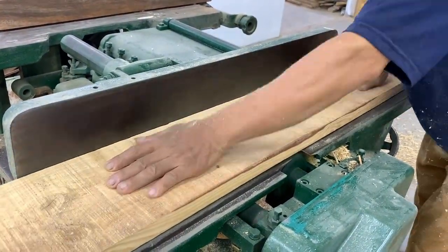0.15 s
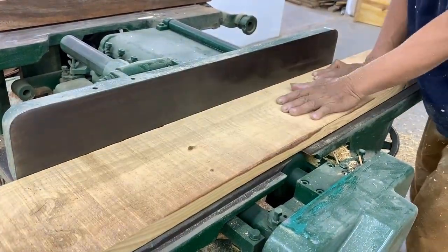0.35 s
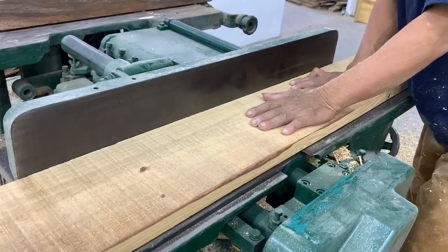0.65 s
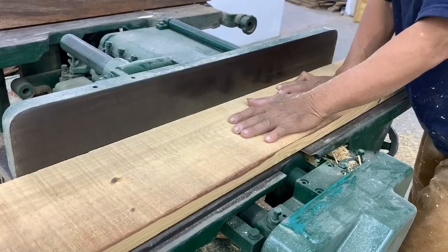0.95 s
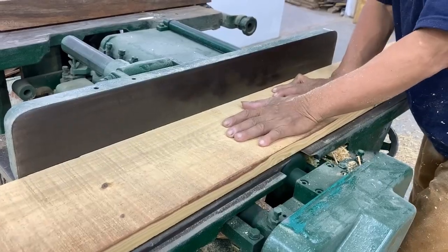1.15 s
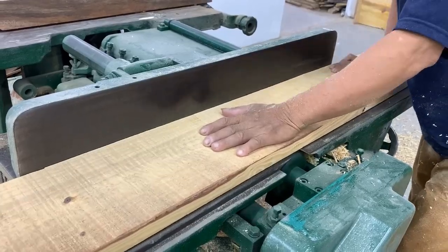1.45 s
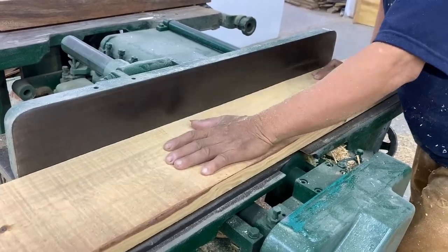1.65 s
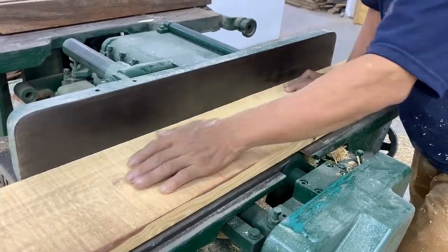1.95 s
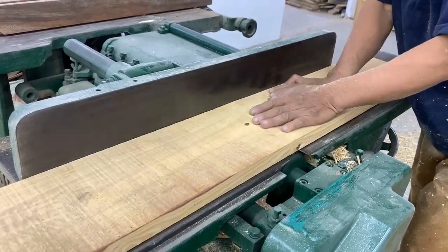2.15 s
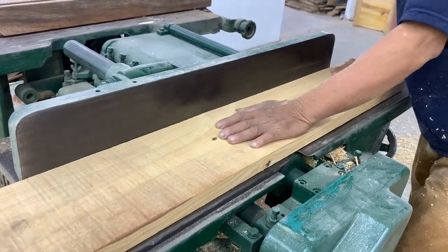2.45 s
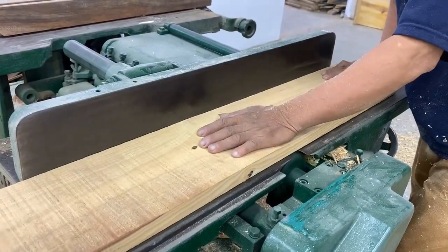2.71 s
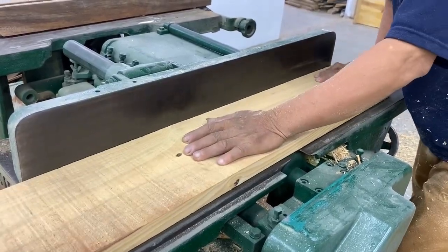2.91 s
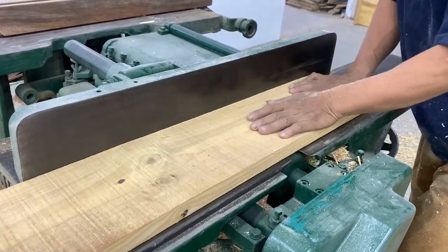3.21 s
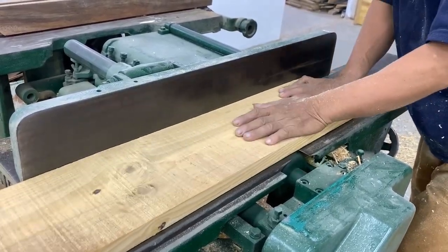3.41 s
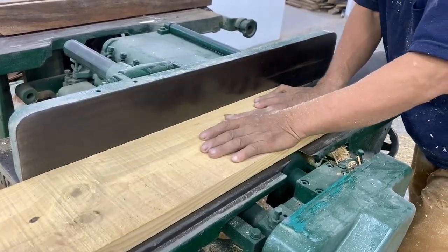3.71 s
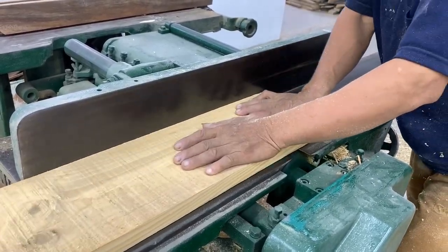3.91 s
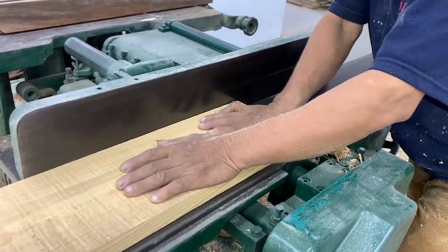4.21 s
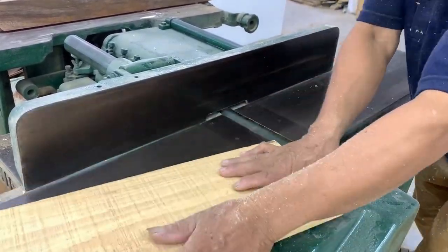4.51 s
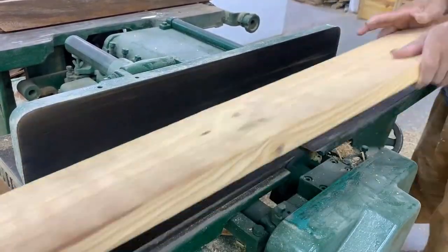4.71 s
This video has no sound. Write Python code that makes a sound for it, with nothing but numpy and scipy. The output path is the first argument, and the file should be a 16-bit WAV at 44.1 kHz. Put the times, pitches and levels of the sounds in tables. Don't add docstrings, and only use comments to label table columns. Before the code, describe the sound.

A jointer is already running and cutting at the start, heard close in stereo in a workshop with a very short reflection tail. Rapid knife strikes merge into a steady buzzing drone around 236 Hz, bright and woody, over motor tones and broad fan wind. The cut starts lighter, then from about 0.2 s surges in uneven presses of roughly a tenth of a second, with lighter contact between, notably around 1.7-2.2 s. Chips hiss throughout, and small fibre rips flick out, stronger near 0.5, 0.7 and 3.9 s. Thin resonant notes sing at 0.2-1.0, 1.1-1.5 and 3.3-4.4 s. The pitch sags very slightly under load. After final firm bites and a rip near 4.4 s, the rasp stops; the pitch recovers slightly and a fuller, clean, hollow hum opens up. A dull knock lands around 4.74 s, then a softer one near 4.86 s, with the machine still running.

```python
import sys
import numpy as np
from scipy import signal
from scipy.fft import rfft, irfft
from scipy.io import wavfile
from scipy.ndimage import uniform_filter1d

SR = 44100
rng = np.random.default_rng(int(sys.argv[2]) if len(sys.argv) > 2 else 0)


def field_ratio(decibels):
    return 10 ** (np.asarray(decibels, dtype=float) / 20)


def transcribe(u):
    v = np.clip(np.atleast_2d(u).T, -1, 1)
    q = np.round(v * 32767).astype(np.int16)
    wavfile.write(sys.argv[1], SR, q)


N = 214406
SECONDS = np.arange(N) / SR
HZ = np.fft.rfftfreq(1024, 1 / SR)
PASS_HZ = 236
CUT_END_S = 4.407

# time in seconds, knife passes in Hz.
SPEED_HZ = [(0, 236.2), (0.5, 236.4), (0.7, 236.15), (0.9, 236.32), (1.1, 236.12), (1.5, 236.13),
            (1.8, 235.72), (2.3, 235.92), (2.5, 236.34), (2.9, 236.04), (3.1, 235.67), (3.5, 235.7),
            (3.9, 235.52), (4.3, 234.98), (4.37, 235.2), (4.44, 235.99), (4.55, 236.69), (4.87, 236.68)]
# frequency in Hz, lead in radians.
LEAD_RAD = [(0, 0), (470, .72), (1180, 3.0), (1420, 3.4), (2125, 6.1), (2790, 7.6), (3070, 10.0),
            (3780, 14.6), (4400, 15.8), (4800, 19.2), (5800, 19.6), (6600, 17.3), (8300, 18.3),
            (9500, 20.4), (10600, 21.4), (15400, 25.1)]
# frequency in Hz, level difference in dB.
PORT_LEAN_DB = [(200, 0.6), (1800, -0.6), (2800, -3), (3700, 0), (5000, -2), (8500, -3.5), (12000, -1)]

# start in seconds, end in seconds, strength in dB,
# lean to the board ring in dB.
BITES = [(0.197, 0.297, -30, -3), (0.277, 0.45, -24.5, 0.5), (0.404, 0.463, -26.5, 3),
         (0.57, 0.641, -37, 4), (0.683, 0.74, -25.5, 2), (0.738, 0.844, -22.5, -0.5),
         (0.883, 0.983, -29, -3), (1.074, 1.17, -26, 1.5), (1.17, 1.293, -25, -1), (1.452, 1.546, -26, 2),
         (1.593, 1.647, -33.5, 3), (1.846, 2.067, -38.5, -19), (2.208, 2.278, -26.5, -5.5),
         (2.364, 2.443, -25.5, -1), (2.426, 2.505, -23, -0.5), (2.658, 2.752, -29, -1.5),
         (2.814, 2.95, -38, 5), (2.95, 3.003, -29.5, 4), (3.153, 3.17, -24, 2), (3.295, 3.377, -24, 4),
         (3.378, 3.475, -25, 2), (3.552, 3.623, -25.5, 1), (3.725, 3.822, -29, -7), (3.8, 3.927, -30.5, -9),
         (3.923, 4.066, -34.5, -15), (4.14, 4.25, -31, 23), (4.24, 4.315, -23, 6.5),
         (4.306, 4.399, -22.5, 3)]
BITE_RISE_S, BITE_FALL_S, REST_LEAN_DB = 0.0038, 0.0012, -2
# time in seconds, light contact in dB, firm seat on the table in dB,
# hard grain in dB, table ring in Hz, edge ring in Hz.
WOOD = [(0, -32, -12, -8.5, 4200, 4220), (.2, -33, 0.5, -12, 4000, 4560), (.45, -35, 2, -9, 4100, 5130),
        (.62, -34, 6, -6, 4000, 5300), (.9, -30, 5.5, 0, 3700, 5600), (1.35, -33.5, 1.5, -2.5, 4000, 5340),
        (1.7, -36.5, 6, 4, 3820, 6500), (1.9, -32, -2, 1, 4020, 5130), (2.15, -32.5, 6, 3, 4060, 4700),
        (2.3, -29, -3.5, -7.5, 3500, 4700), (2.55, -33.5, -0.5, -4.5, 3280, 6360),
        (2.9, -27, 4, -4.5, 3535, 7000), (3.05, -30, 2.5, -4, 4050, 5400),
        (3.45, -30.5, 5.5, -0.5, 3720, 7000), (3.6, -30, 3.5, -0.5, 3940, 5030),
        (4.0, -31, 3.5, -8, 3800, 5900), (4.17, -29, -8.5, -1.5, 3380, 5400),
        (4.4, -26, 5.5, -15, 4050, 6000)]
# board, table, edge, bright, in dB.
RING_DB = [-1.82, 0.5, -1.7, -0.84]
LEAN_SHARE = [0.75, 0.066, -1.04, -0.39]
BITE_SHARE = [0.98, 0.96, 1, 0.7]
BOARD_HZ, BOARD_HZ_PER_DB, BRIGHT_HZ, BRIGHT_WANDER_HZ = 2156, 4, 8300, 307
# gain in dB, order by order from the fifth.
TABLE_MODES_DB = [4, 9, 0, -6, -1, -2, -2, -1, 4, -1, -2, -1, 3, 1, 1, 1, 2, 4, 4, -3, -2, 3, 0, 2, 1, 5,
                  -1, -2, -2, 3, 3, -1, -1, 2, 3, 2, -1, 1, 2, 1, 0, 3, 1, -1]
# order, start in seconds, end in seconds, gain
# in dB.
ORDER_SWELLS = [(38, 0, 1.95, 4), (42, .1, 1.7, 5), (26, .15, 1.7, 4), (15, .15, 1.05, -5), (13, .2, .5, 6),
                (21, .25, .45, -9), (19, .25, 1.3, -5), (6, .3, 1.0, -8), (33, .3, 1.95, -4), (12, .55, 1.3, -7),
                (25, .55, 2.5, 3), (11, .6, 1.0, -13), (10, .65, 2.55, 6), (5, .7, 2.5, -4), (23, 1.05, 1.7, 7),
                (20, 1.15, 1.7, -7), (11, 1.3, 2.45, 5), (22, 1.3, 2.35, 4), (24, 1.45, 2.35, 5),
                (17, 1.5, 3.05, -5), (6, 1.55, 2.6, 6), (34, 1.6, 2.9, -4), (36, 1.6, 3.05, -4),
                (35, 1.6, 2.05, -6), (32, 1.75, 2.3, 7), (18, 1.85, 2.1, -10), (29, 2.05, 2.25, -10),
                (30, 2.2, 2.4, -9), (23, 2.35, 3.45, -5), (33, 2.35, 3.45, -5), (43, 2.4, 4.1, -6),
                (22, 2.45, 3.55, 7), (5, 2.5, 3.15, 5), (21, 2.65, 3.0, 9), (11, 2.7, 3.0, -13),
                (16, 2.95, 4.4, -3), (39, 3.0, 3.7, 6), (14, 3.0, 3.7, -6), (42, 3.05, 4.2, -6),
                (10, 3.05, 4.15, 4), (11, 3.1, 3.9, 5), (7, 3.25, 4.4, -4), (19, 3.3, 3.5, -11),
                (32, 3.3, 3.6, -8), (24, 3.6, 4.15, 5), (18, 3.65, 4.3, 7), (6, 3.7, 4.25, 7), (21, 3.8, 4.4, 6),
                (34, 3.85, 4.15, 8), (13, 4.0, 4.2, -9)]
ORDER_SWELL_WIDTH_HZ, ORDER_SWELL_EDGE_S = 130, 0.04

# frequency in Hz, level in dB.
CHIP_TONE_DB = [(600, -19), (1200, 8), (2200, -1), (4000, 3), (6000, 7), (8500, 1), (10800, -3),
                (13500, -1), (16000, 6)]
# frequency in Hz, likeness 0-1.
CHIP_LIKENESS = [(1500, 0.83), (2000, 0.49), (3000, 0.98), (12000, 0.097)]
CHIP_DB, CHIP_FOLLOW, CHIP_FLUTTER_DB = -39, 0.11, 1.8
# time in seconds, level in dB.
TEARS = [(.06, -41), (.14, -40), (.37, -48), (.46, -33), (.57, -34), (.70, -34), (1.22, -39), (1.33, -37),
         (2.33, -40), (2.56, -49), (2.82, -45), (3.34, -36), (3.61, -36), (3.88, -34), (4.14, -51),
         (4.39, -31)]
TEAR_S, TEAR_RING_DB = 0.023, 3.5

# level under the board in dB, fade in dB a second,
# share of the bite, gain in the open in dB, share of the board's glance.
LOW_ORDERS = [(-39.5, -1.98, 0.13, -0.5, 0.07), (-34.5, -1.44, 0.036, 14.5, 0.23),
              (-36.5, -0.28, 0.4, 0.5, 1.0), (-31.5, -0.76, 0.17, 6, 0.072)]
LOW_ORDER_DB = [0.064, 1.5, 2.8, 9.1]
CHOKE_DB = [0, -5, 0, 0]
CHOKE_AT_S, CHOKE_WIDTH_S = 4.335, 0.045
# order, level in dB.
UPPER_ORDERS = [(5, -49), (6, -41), (7, -49), (8, -43), (9, -52), (10, -42), (11, -58), (12, -42),
                (14, -46), (16, -55), (17, -55), (18, -49), (20, -56), (22, -57), (24, -60), (40, -53)]
COVER_DB, UPPER_GLANCE = -37, 1.6
# time in seconds, opening 0-1, glance off its face in dB.
LIFT = [
    (4.22, 0, -1.5),
    (4.34, 0.1, -11),
    (4.42, 0.57, -3.5),
    (4.52, 0.7, -3),
    (4.59, 0.95, -0.5),
    (4.63, 0.98, -1),
    (4.76, .95, 0.5),
    (4.86, 0.96, -1.5),
]

# frequency in Hz, level in dB.
MOTOR_TONES = [(576, -56), (664, -46), (1335, -55), (2002, -46), (2142, -45.5), (2778, -39)]
# fade in dB a second, wavering in dB, share of the belt swells.
MOTOR_MOVES = [(-1, 5, 0.28), (0.6, 2.2, 0.9), (-1.1, 11, 0.1), (-1.3, 4, 0.12), (0.2, 1.7, 0.1),
               (0, 2.5, 0.3)]
# time in seconds, swell in dB.
BELT_SWELLS = [
    (.4, 6.6),
    (.65, 13),
    (2.78, 3),
    (3.55, 3),
    (4.35, 2.4),
]
BELT_SWELL_S = 0.15

# frequency in Hz, level in dB.
WIND_TONE_DB = [(40, -11), (100, -27), (200, -4), (450, -4.5), (900, 4.5), (1150, -3.5), (1700, 3),
                (3000, 4), (4000, -2.5), (6000, -1), (9000, -6.5), (11000, -8), (13500, -2), (16000, -7.5)]
# frequency in Hz, likeness 0-1.
WIND_LIKENESS = [(60, 0.24), (200, 0.89), (1450, 0.39), (1900, 0.17), (2500, 0.054), (8000, 0.081)]
WIND_DB, RUMBLE_DB, THUD_S = -34.5, -43, 0.035
# time in seconds, level in dB.
THUDS = [
    (0.0, -56),
    (4.6, -64),
    (4.74, -41.5),
    (4.86, -46),
]

# order, start in seconds, end in seconds, level in dB,
# extra lead of the left port in radians.
SINGS = [
    (7, .24, .47, -40, .5),
    (20, .2, 1.0, -38, .3),
    (16, 1.06, 1.55, -37, -.6),
    (23, 1.1, 1.55, -34, .3),
    (15, 3.3, 3.75, -36, 0),
    (22, 3.62, 4.05, -35, .3),
    (5, 4.08, 4.41, -45, -1.5),
    (19, 4.15, 4.41, -32, 1.6),
    (12, 4.18, 4.41, -33, -.6),
]
SING_DB, SING_EDGE_S = -0.5, 0.035


def evened(x):
    return x / np.sqrt(np.mean(abs(x) ** 2) + 1e-20)


def read(points, hz):
    f, value = np.transpose(points)
    return np.interp(np.log(hz + 1), np.log(f + 1), value)


def curves(rows, t):
    s, *columns = np.transpose(rows)
    return [np.interp(t, s, c) for c in columns]


def bumps(rows, t, width_s):
    return sum(field_ratio(db) * np.exp(-((t - s) / width_s) ** 2) for s, db in rows)


def flutter(t, rate_hz):
    rates = rate_hz * np.geomspace(0.1, 1, num=12)
    return evened(sum(np.sin(2 * np.pi * (f * t + rng.random())) for f in rates))


def patches(frames, bins, span):
    field = rng.standard_normal((frames, len(HZ), 3)).T
    field = uniform_filter1d(field, bins, 1)
    field = uniform_filter1d(field, span, 2)
    return evened(uniform_filter1d(field, span, 2))


def ports(hz):
    half_lead = np.exp(0.5j * np.interp(hz, *np.transpose(LEAD_RAD)))
    half = half_lead * field_ratio(read(PORT_LEAN_DB, hz) / 2)
    return np.array([half, 1 / half])


def hiss(colour, likeness):
    a, b, c, d = rng.standard_normal((colour.shape[1], len(HZ), 4)).T
    like = np.clip(likeness, 0, 1)
    left = a + 1j * b
    right = like * left + np.sqrt(1 - like ** 2) * (c + 1j * d)
    z = np.array([left, right]) * colour * ports(HZ)[:, :, None]
    return evened(signal.istft(z, nperseg=1024, noverlap=768)[1][:, :N])


def tone(turns, hz, db):
    return np.sqrt(2) * field_ratio(db) * (ports(hz)[:, None] * np.exp(2j * np.pi * turns)).real


def ring(hz, width_hz):
    shape = 1 / (1 + 2j * (HZ[:, None] - hz) / width_hz) ** 2
    return shape / np.sqrt((abs(shape) ** 2).mean(0))


def causal(gain):
    fold = np.r_[1, 2 * np.ones(511), 1, np.zeros(511)][:, None]
    cepstrum = irfft(np.log(gain + 1e-6), axis=-2)
    return np.exp(rfft(cepstrum * fold, axis=-2))


def bite(t):
    start, end, db, lean = np.transpose(BITES)[:, :, None]
    rise = 1 + np.tanh((t - start) / BITE_RISE_S)
    fall = 1 - np.tanh((t - end) / BITE_FALL_S)
    power = (0.22 * rise * fall * field_ratio(db)) ** 2
    rest = field_ratio(curves(WOOD, t)[0]) ** 2
    total = power.sum(0) + rest
    return 10 * np.log10(total), ((power * lean).sum(0) + rest * REST_LEAN_DB) / total


def rings(t):
    depth_db, lean_db = bite(t)
    _, seat_db, grain_db, table_hz, edge_hz = curves(WOOD, t)
    board_db, table_db, edge_db, bright_db = [
        follow * (depth_db + 29.5) - 30 + db + share * lean_db
        for db, share, follow in zip(RING_DB, LEAN_SHARE, BITE_SHARE)]
    table_db = table_db + seat_db
    tear = bumps(TEARS, t, TEAR_S) * field_ratio(TEAR_RING_DB)
    bright_db = 20 * np.log10(np.hypot(field_ratio(bright_db + grain_db), tear))
    chip_db = CHIP_DB + 1.5 + CHIP_FOLLOW * (depth_db + 32)
    board_hz = BOARD_HZ + BOARD_HZ_PER_DB * (board_db + 30)
    bright_hz = BRIGHT_HZ + BRIGHT_WANDER_HZ * flutter(t, rate_hz=9.6)
    parts = [(board_db, ring(board_hz, 1900)), (table_db, ring(table_hz, 1100)),
             (edge_db, ring(edge_hz, 2200)), (bright_db, ring(bright_hz, 3200)),
             (chip_db, ring(12400, 4500))]
    return np.sqrt(sum(abs(field_ratio(db) * shape) ** 2 for db, shape in parts))


def order_swells(t):
    order, start, end, db = np.transpose(ORDER_SWELLS)[:, :, None]
    rise = 1 + np.tanh((t - start) / ORDER_SWELL_EDGE_S)
    fall = 1 - np.tanh((t - end) / ORDER_SWELL_EDGE_S)
    near = np.exp(-((HZ - PASS_HZ * np.round(order)) / ORDER_SWELL_WIDTH_HZ) ** 2)
    return field_ratio(near.T @ (db * 0.25 * rise * fall))


def strikes(turns):
    at = np.flatnonzero(np.diff(np.floor(turns)) > 0)
    at = at[at < CUT_END_S * SR]
    late = (turns[at + 1] % 1) / (turns[at + 1] - turns[at])
    jitter, size = rng.standard_normal((len(at), 2)).T
    place = at + 1 - late + 0.1 * jitter
    grid = np.round(place).astype(int)[:, None] + np.arange(-16, 17)
    pulse = np.sinc(grid - place[:, None]) * np.hanning(33) * field_ratio(0.5 * size)[:, None]
    train = np.bincount(np.clip(grid, 0, N - 1).ravel(), pulse.ravel(), N)
    return train * np.sqrt(SR / PASS_HZ)


def blows(turns):
    _, t, z = signal.stft(strikes(turns), SR, nperseg=1024, noverlap=896)
    body = rings(t) * order_swells(t)
    modes = field_ratio(np.interp(HZ / PASS_HZ, 5 + np.arange(len(TABLE_MODES_DB)), TABLE_MODES_DB))
    contact = HZ ** 2 / (HZ ** 2 + 700 ** 2)
    left, right, both = patches(len(t), bins=5, span=45)
    sides = np.array([left, right]) * np.clip(HZ / 3000 - 0.35, 0, 1)[:, None]
    uneven = field_ratio(1.6 * both + 2.3 * sides)
    echo = 1 + 0.2 * np.exp(-2j * np.pi * HZ * 0.00105)
    smear_rad = (0.28 + 0.65 * np.exp(-((HZ - 4500) / 1600) ** 2))[:, None]
    z = z * causal(body * (modes * contact)[:, None] * uneven)
    z = z * (echo * ports(HZ))[:, :, None]
    z = z * np.exp(0.4j * sides + 1j * smear_rad * both) * field_ratio(-1.5)
    return signal.istft(z, nperseg=1024, noverlap=896)[1][:, :N]


def chips(turns):
    drift = patches(N // 256 + 5, bins=40, span=6)[2]
    colour = field_ratio(read(CHIP_TONE_DB, HZ)[:, None] + 2.0 * drift)
    spray = hiss(colour, read(CHIP_LIKENESS, HZ)[:, None])
    burst = evened(1.2 + np.exp(-(turns % 1) / 0.15))
    spray_db = CHIP_DB + CHIP_FOLLOW * (bite(SECONDS)[0] + 30)
    spray_db = spray_db + CHIP_FLUTTER_DB * flutter(SECONDS, rate_hz=17)
    level = np.hypot(field_ratio(spray_db), bumps(TEARS, SECONDS, TEAR_S))
    return spray * burst * level * field_ratio(2.5) * (SECONDS < CUT_END_S)


def shop(x):
    taps = np.zeros((2, 8000))
    at = np.arange(200, 7980, 20) + rng.integers(0, 20, (2, 389))
    np.put_along_axis(taps, at, rng.choice([-1., 1.], at.shape), 1)
    taps *= field_ratio(-60 * np.arange(8000) / SR / 0.19)
    return signal.oaconvolve(x, taps / np.linalg.norm(taps[0]), axes=1)[:, :N]


def hum(turns):
    opening, glance_db = curves(LIFT, SECONDS)
    glance_db = glance_db * np.clip((SECONDS - LIFT[0][0]) * 10 + 1, 0, 1)
    depth_db = (bite(SECONDS)[0] + 30) * (SECONDS < CUT_END_S)
    depth_db = uniform_filter1d(depth_db, size=3000)
    choke = np.exp(-((SECONDS - CHOKE_AT_S) / CHOKE_WIDTH_S) ** 2)
    low = 0
    for k, (db, fade, load, free, turn) in enumerate(LOW_ORDERS):
        level_db = db + fade * SECONDS + load * depth_db + free * opening + turn * glance_db
        level_db = level_db + 0.5 * flutter(SECONDS, rate_hz=6.1)
        level_db = level_db + LOW_ORDER_DB[k] + CHOKE_DB[k] * choke
        low = low + tone(turns * (k + 1), PASS_HZ * (k + 1), level_db)
    upper = sum(tone(turns * k + rng.random(), PASS_HZ * k, db) for k, db in UPPER_ORDERS)
    cover = np.clip((CUT_END_S - SECONDS) / 0.022 + 1, 0, 1)
    return low + upper * field_ratio(COVER_DB * cover + UPPER_GLANCE * glance_db)


def motor():
    drift = evened(uniform_filter1d(rng.standard_normal((N, len(MOTOR_TONES))), 3000, 0)).T
    swell_db = 20 * np.log10(1 + bumps(BELT_SWELLS, SECONDS, BELT_SWELL_S))
    total = 0
    for (hz, db), (fade, waver, share), w in zip(MOTOR_TONES, MOTOR_MOVES, drift):
        level_db = db + fade * (SECONDS - 2) + waver * w + share * (swell_db - 3)
        total = total + tone(hz * SECONDS + 0.04 * w, hz, level_db)
    return total


def wind():
    frames = N // 256 + 5
    drift = patches(frames, bins=12, span=10)[2]
    t = np.arange(frames) * 256 / SR
    rumble = field_ratio(RUMBLE_DB) + bumps(THUDS, t, THUD_S)
    low = abs(ring(400, 545)) * rumble * field_ratio(43.5)
    colour = field_ratio(read(WIND_TONE_DB, HZ)[:, None] + 1.87 * drift) * (1 + 0.033 * low ** 2)
    return field_ratio(WIND_DB) * hiss(colour, read(WIND_LIKENESS, HZ)[:, None])


def singing(turns):
    def gate(s):
        return 0.5 + 0.5 * np.tanh((SECONDS - s) / SING_EDGE_S)

    spot = np.array([[1], [-1]]) / (4 * np.pi)
    total = 0
    for k, start, end, db, lead in SINGS:
        swell = gate(start) * (1 - gate(end - SING_EDGE_S))
        phase = turns * k + rng.random() + lead * spot
        total = total + swell * tone(phase, PASS_HZ * k, db + SING_DB)
    return total


def scene():
    turns = np.cumsum(curves(SPEED_HZ, SECONDS)[0]) / SR
    cut = blows(turns) + chips(turns)
    echoes = field_ratio(-12) * shop(cut)
    air = hum(turns - 0.28)
    return cut + echoes + air + motor() + wind() + singing(turns)


def roll_off(x):
    return signal.sosfilt(signal.butter(12, 15970, fs=SR, output="sos"), x)


def record(dry):
    bass_cut = signal.butter(N=2, Wn=110 / SR * 2, btype="high", output="sos")
    top_cut = signal.firwin(511, 15800, window=("kaiser", 9), fs=SR)
    mix = signal.sosfilt(bass_cut, dry)
    mix = signal.oaconvolve(mix, top_cut[None], "same")
    return roll_off(mix)


dry = scene()
out = record(dry)
transcribe(out)
```